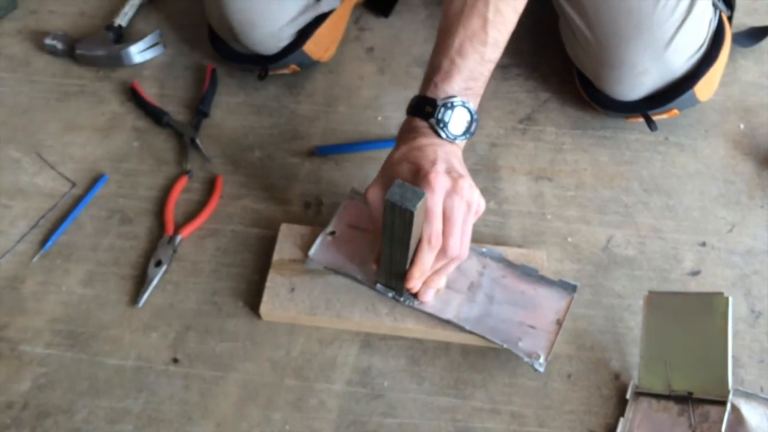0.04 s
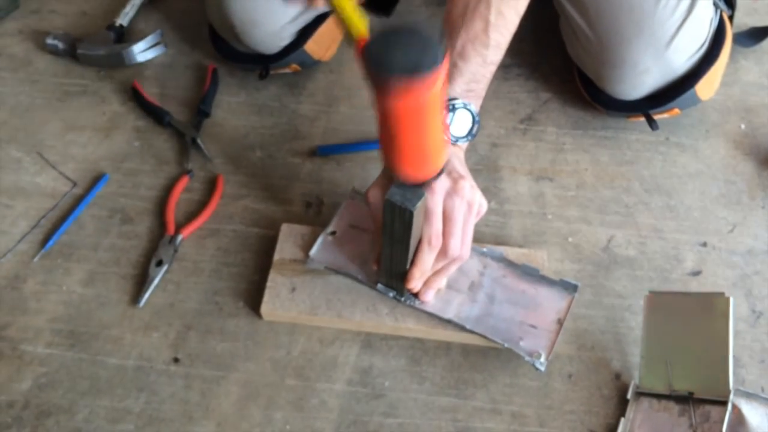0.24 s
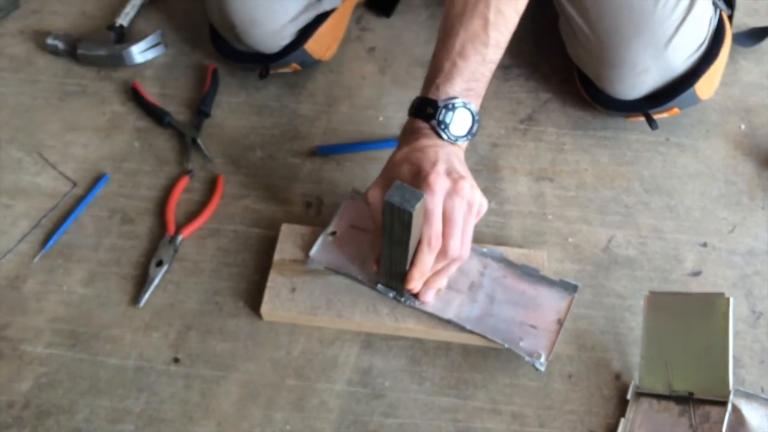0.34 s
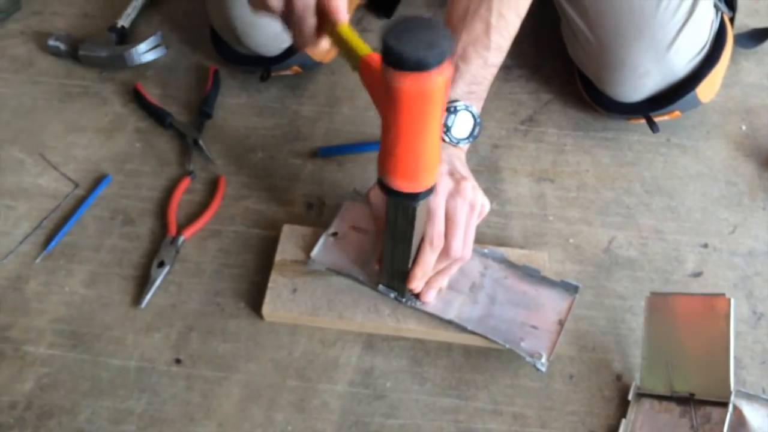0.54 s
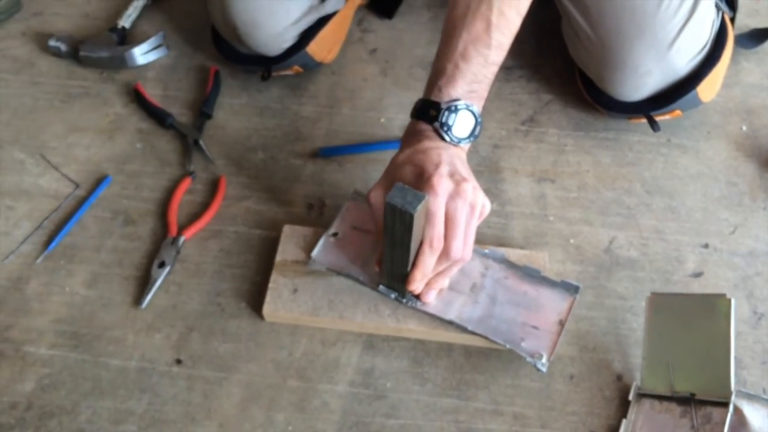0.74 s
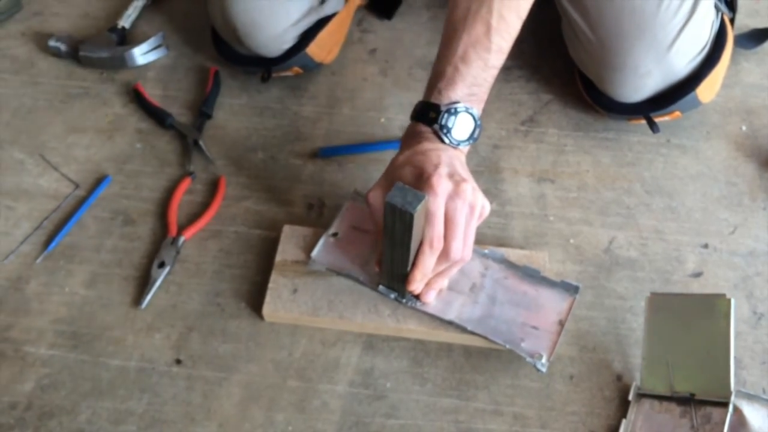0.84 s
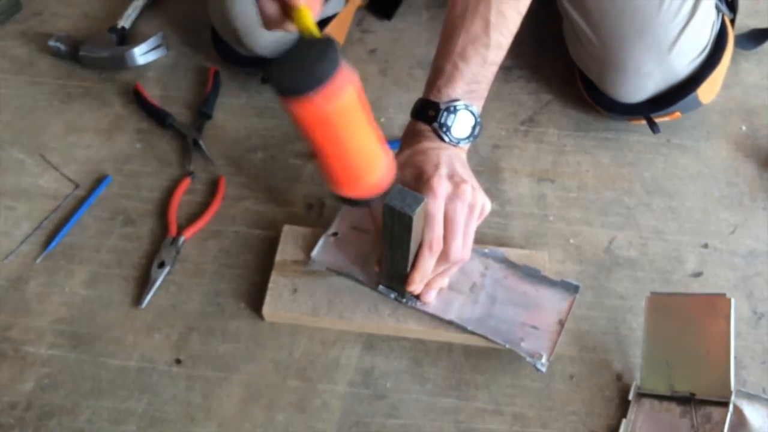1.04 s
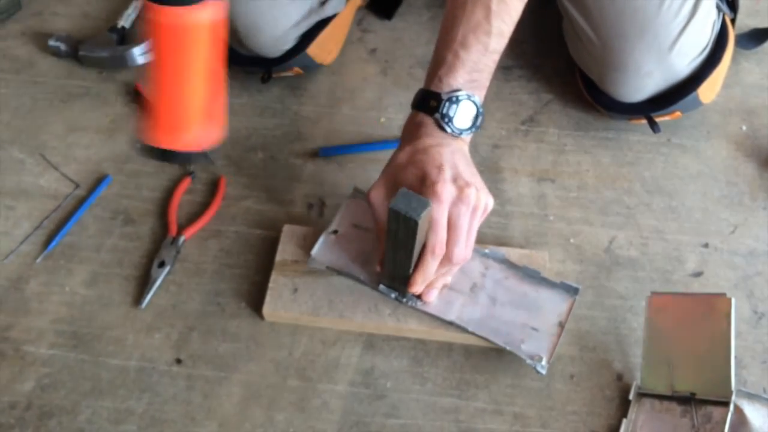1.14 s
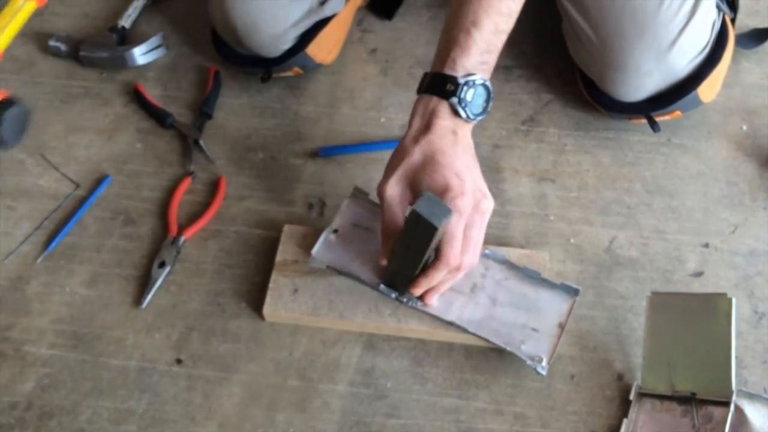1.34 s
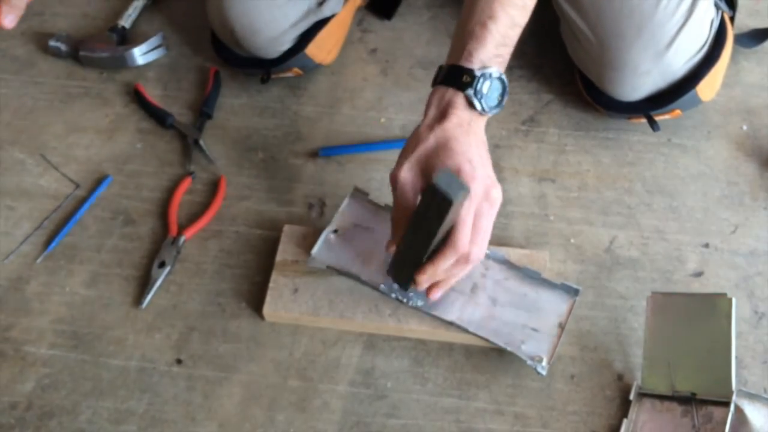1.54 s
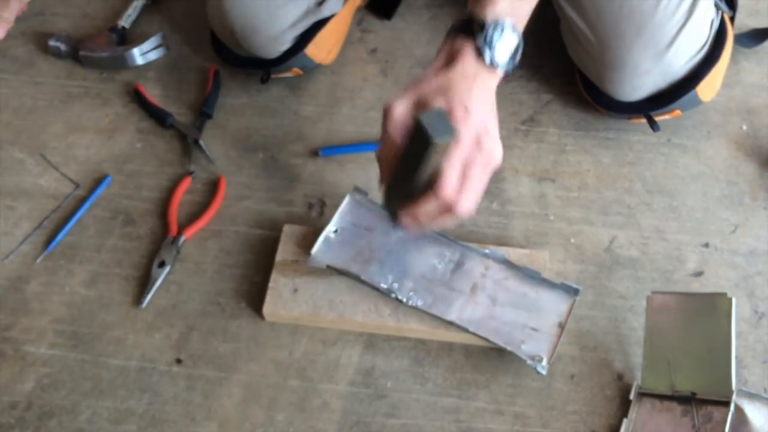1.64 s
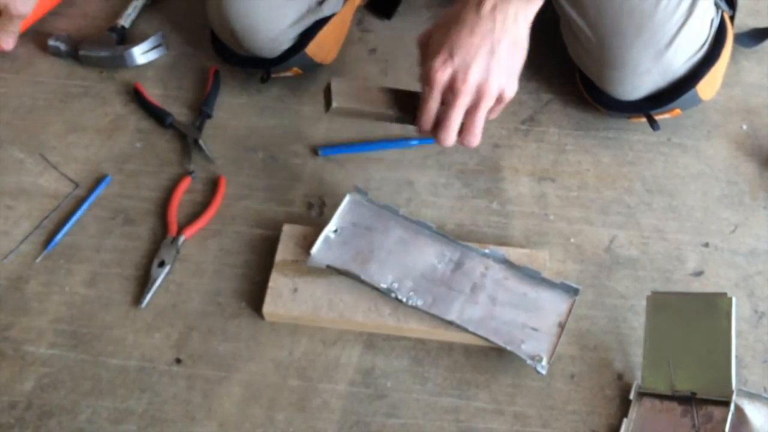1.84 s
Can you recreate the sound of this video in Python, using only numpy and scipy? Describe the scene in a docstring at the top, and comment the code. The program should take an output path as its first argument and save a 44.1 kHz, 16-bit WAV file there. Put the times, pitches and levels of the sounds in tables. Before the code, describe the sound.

Three loud hammer blows on a wood block over thin aluminium, echoing in a hard room

```python
"""Three hammer blows ring out in a large hard room with a far wall; a wood block is held on a thin aluminium panel.
A short swell of grainy noise leads into the first blow and sleeves rustle softly. The sound drops out briefly, then
small knocks, a clink of metal and a scrape follow, as the panel is dragged over the board beneath.
Random clicks make the clatter and scrape, ringing tones make wood and metal, and fading noise makes the room."""
import sys
import numpy as np
from scipy import signal
from scipy.fft import rfft, irfft
from scipy.io import wavfile

SR = 44100
rng = np.random.default_rng(int(sys.argv[2]) if len(sys.argv) > 2 else 0)


def master(y):
    """Save y as 16-bit WAV."""
    cut = np.clip(np.atleast_2d(y).T, -1, 1)
    pcm = np.round(cut * 32767)  # scale
    wavfile.write(sys.argv[1], SR, pcm.astype(np.int16))


N = 83790
TIME = np.arange(N) / SR  # seconds
DROPOUT_S = 1.5715

# Tones of the panel and floor boards ringing on: (frequency [Hz], relative level [dB], time to fall 60 dB [s])
PANEL_TONES = [(680, -20, .7), (1755, -8, .5), (1846, -9, .5), (1929, -11, .5), (2201, -8, .65),
               (2369, -9, .6), (2520, -10, .6), (2682, -9, .55), (2874, -9, .7), (3307, -11, .5),
               (3492, -12, .4), (4300, -12, .35)]


def from_db(db):
    """Turns decibels into a gain."""
    return 10 ** (np.asarray(db) / 20)


def rms_one(x):
    """Scales a sound to an average (rms) level of 1."""
    return x / np.sqrt(np.mean(x ** 2) + 1e-20)


def at_hz(points, hz):
    """Reads a curve of (frequency, value) points, with straight lines on a log frequency scale."""
    points_hz, values = np.array(points)[:, 0], np.array(points)[:, 1]
    return np.interp(np.log(hz), np.log(points_hz), values)


def in_time(rows):
    """Turns a curve of (time [s], level [dB]) into a gain for every sample."""
    times, levels_db = np.transpose(rows)
    return from_db(np.interp(TIME, times, levels_db))


def fade(t, t60):
    """Silent before time zero, then falls by 60 dB per t60 seconds."""
    return (t >= 0) * from_db(-60 * np.maximum(t, 0) / t60)


def band(x, low_hz, high_hz):
    """Keeps the sound between two frequencies."""
    return signal.sosfilt(signal.butter(2, [low_hz, high_hz], "band", fs=SR, output="sos"), x)


def above(x, hz, order=2):
    """Keeps the sound above one frequency."""
    return signal.sosfilt(signal.butter(order, hz, "high", fs=SR, output="sos"), x)


def colour(x, spectrum, tilt_db=0):
    """Shapes by a spectrum with minimum phase, so nothing sounds early; white noise keeps its rms."""
    size = 2 ** 13
    hz = np.maximum(np.arange(size // 2 + 1) * SR / size, 10)
    level_db = at_hz(spectrum, hz) + tilt_db * np.log2(hz / 3000)  # tilt in dB per octave
    # Folding the cepstrum (the transform of the log spectrum) gives minimum phase.
    cepstrum = irfft(np.log(from_db(level_db)))
    cepstrum[1:size // 2] *= 2
    cepstrum[size // 2 + 1:] = 0
    response = irfft(np.exp(rfft(cepstrum)))
    response = response / np.sqrt(np.sum(response ** 2))
    return signal.fftconvolve(x, response)[:len(x)]


def grit(per_s, spread_db):
    """Random clicks of uneven size and either sign, scaled to rms 1."""
    sizes = from_db(spread_db * np.minimum(rng.exponential(1, N), 4))
    signed = sizes * rng.choice([-1, 1], N)
    return rms_one(signed * (rng.random(N) < per_s / SR))


def waver(per_s):
    """Slow chance: random points, per_s of them each second, joined by straight lines."""
    knots = rng.standard_normal(200)
    return np.interp(TIME * per_s, np.arange(200), knots)


def ring(x, hz, t60):
    """A resonance: a click of height 1 sets off a dying sine that starts at about height 1."""
    shrink = from_db(-60 / (t60 * SR))  # per sample
    turn = 2 * np.pi * hz / SR  # radians per sample
    return signal.lfilter([0, np.sin(turn)], [1, -2 * shrink * np.cos(turn), shrink ** 2], x + 1e-18)


def strike(s, db, tones, spread_db):
    """One click sets all tones of a body ringing, each with a strength that varies by chance."""
    click = np.zeros(N)
    click[int(s * SR)] = from_db(db)
    chance = rng.normal(0, 1, len(tones))
    out = np.zeros(N)
    for (hz, tone_db, t60), luck in zip(tones, chance):
        out += from_db(tone_db + spread_db * luck) * ring(click, hz, t60)
    return out


def at_pitch(tones, pitch):
    """Multiplies the frequency of every tone of a body by one factor."""
    return [(hz * pitch, db, t60) for hz, db, t60 in tones]


def hammer():
    """Each blow: a dense clatter, knock and boom of wood, the ring of panel and floor, the room's answer."""
    # Hammer blows: (time [s], level of clatter and room [dB], knock [dB], knock pitch [factor],
    # boom [dB], boom pitch [Hz], brightness [dB per octave], far-wall echo [dB])
    blows = [(0.2058, -13, -24.5, 0.59, -17, 75, 0.23, -4.5),
             (0.57, -11.5, -27.5, 0.69, -24, 70, 0.27, -4.5),
             (0.9672, -12, -19.5, 1.01, -17, 150, 0.17, -7)]
    # Colour of the panel clattering against block and board: (frequency [Hz], relative level [dB per Hz])
    clatter_colour = [(59, -43), (100, -3), (438, -4), (1090, -5.5), (1370, -5), (2180, 0), (2690, -35),
                      (3770, 2), (4860, -5.5), (8770, -11.5), (15500, -16.5)]
    # Thud of block and board: (frequency [Hz], relative level [dB], time to fall 60 dB [s])
    wood_tones = [(364, -11.5, 0.022), (587, -3, 0.035), (674, 5.5, 0.024), (916, 0.5, 0.046),
                  (1350, -16, .04)]
    # Floor boards that swell in and ring: (frequency [Hz], level [dB], time to fall 60 dB [s])
    floor_tones = [(213.4, -38.5, 0.83), (289.4, -44.5, 1.23)]
    clicks_per_s, hold_s, clatter_t60_s = 6000, 0.0045, 0.066
    panel_db = -22
    boom_rise_s, boom_t60_s = 0.0048, 0.059
    floor_rise_s = 0.034

    out = np.zeros(N)
    for s, db, knock_db, pitch, boom_db, boom_hz, tilt_db, echo_db in blows:
        t = TIME - s
        # The clatter holds its level for a moment, then dies away.
        clatter = grit(clicks_per_s, 0.67) * (t >= 0) * fade(np.maximum(t - hold_s, 0), clatter_t60_s)
        clatter = above(colour(clatter, clatter_colour, tilt_db), 150)
        out += from_db(db) * (clatter + room_tail(t, echo_db, tilt_db))

        out += above(strike(s + .002, knock_db, at_pitch(wood_tones, pitch), 1.5), 150)
        out += strike(s, db + panel_db, PANEL_TONES, 1.5)

        boom = np.sin(2 * np.pi * boom_hz * t) * np.clip(t / boom_rise_s, 0, 1)
        out += from_db(boom_db) * boom * fade(t, boom_t60_s)
        out += strike(s, 0, floor_tones, 1.0) * np.clip(t / floor_rise_s, 0, 1)
    return out


def room_tail(t, echo_db, tilt_db):
    """Half-octave bands of noise, each dying at its own rate: first tail, near and far-wall echo, slow tail."""
    # Colour of the tail: (frequency [Hz], relative level [dB per Hz])
    tail_colour = [(35, -74), (60, -38.5), (170, -24), (250, -16.5), (345, -11), (509, -19), (705, -13),
                   (1070, -14), (1620, -10), (1760, -6), (2050, -4), (2710, -0.5), (3600, -3), (3900, -5),
                   (9970, -15.5), (15500, -28.5)]
    # How long the room rings: (frequency [Hz], time to fall 60 dB [s])
    room_t60 = [(80, 0.39), (200, 0.49), (700, 0.58), (1800, 0.67), (3000, 0.51), (5000, 0.59),
                (9000, 0.38), (14000, 0.23)]
    room_db, room_rise_s = -3.5, 0.0019
    slow_db, slow_factor = -7.5, 2.27  # the slow tail takes this many times longer to die
    near_s, near_db, near_width_s = 0.041, -1, 0.0027
    far_s, far_rise_s, far_t60_s = 0.063, 0.0059, 0.35
    panel_db, panel_t60_s = -42, 0.14
    grain_db, grain_per_s = 1.2, 30

    noise = colour(rng.standard_normal(N), tail_colour, tilt_db)
    # A second noise rings the panel's tones, so the tail carries them in blurred form.
    drive = colour(rng.standard_normal(N), tail_colour, tilt_db)
    for hz, db, _ in PANEL_TONES:
        noise = noise + from_db(panel_db + db) * ring(drive, hz, panel_t60_s)

    since_far = t - far_s
    far_rise = np.clip(since_far / far_rise_s, 0, 1)
    far = from_db(echo_db) * far_rise * fade(since_far - far_rise_s * far_rise, far_t60_s)
    near_bump = from_db(near_db) * np.exp(-.5 * ((t - near_s) / near_width_s) ** 2)

    spectrum = rfft(noise)
    bin_hz = np.maximum(np.arange(N // 2 + 1) * SR / N, 10)
    out = np.zeros(N)
    for centre_hz in 44 * 2 ** np.arange(0, 9, .5):
        # Neighbouring bands overlap and add up to the whole.
        share = np.cos(np.pi / 2 * np.clip(2 * np.log2(bin_hz / centre_hz), -1, 1)) ** 2
        t60 = at_hz(room_t60, centre_hz)
        first = fade(t, t60)
        slow = from_db(slow_db) * fade(t, t60 * slow_factor)
        near = near_bump * first
        level = np.sqrt(first ** 2 + slow ** 2 + far ** 2 + near ** 2)
        # Each band wavers on its own.
        out += irfft(spectrum * share, N) * level * from_db(grain_db * waver(grain_per_s))
    return from_db(room_db) * np.clip(t / room_rise_s, 0, 1) * out


def lead_in():
    """A short grainy noise, made of dense random clicks, swells just before the first blow and stops."""
    # Loudness of the lead-in noise: (time [s], level [dB])
    lead_in_level = [(.13, -75), (.165, -54), (.18, -63), (.19, -35.5), (.197, -32.5), (.206, -34),
                     (.21, -62)]
    # Colour of the lead-in noise: (frequency [Hz], relative level [dB per Hz])
    lead_in_colour = [(150, -17), (600, 9), (1200, -9), (2200, 2), (3200, -6), (4200, -11), (15000, -34.5)]
    running = TIME < lead_in_level[-1][0]
    return in_time(lead_in_level) * running * colour(grit(4500, 1.5), lead_in_colour)


def small_sounds():
    """Wood knocks ring briefly with a crack of noise; one metal clink rings with a short wash of hiss."""
    # Small knocks of wood: (time [s], level [dB], crack relative to knock [dB], pitch [factor])
    knocks = [(0.1985, -33.5, -46.5, 0.986), (1.555, -40, -3.5, 0.99), (1.595, -61, -5, 1.04),
              (1.640, -48, -15, 0.97), (1.733, -39, -23, 1.04), (1.747, -56.5, -21, 0.66)]
    # Tones of a knock: (frequency [Hz], relative level [dB], time to fall 60 dB [s])
    knock_tones = [(202, -4.5, 0.07), (424, -12, 0.03), (650, 1.5, 0.015), (983, 5.5, 0.023),
                   (1300, 2, 0.011), (2710, -15, 0.0027)]
    # Tones of the clink: (frequency [Hz], relative level [dB], time to fall 60 dB [s])
    clink_tones = [(1732, -15, .45), (1760, -11, .35), (4300, -13, .05), (4420, -14, .06), (7100, -1, .02),
                   (7200, -24, .7), (9600, -10, .015), (11800, -6, .012)]
    clink_s, clink_db = 1.6415, -43
    wash_db, wash_t60_s = -47.5, 0.14  # level before the band filter
    crack_t60_s = 0.017

    out = strike(clink_s, clink_db, clink_tones, 0)
    hiss = rng.standard_normal(N)
    out += from_db(wash_db) * band(hiss, 1500, 5000) * fade(TIME - clink_s, wash_t60_s)
    for s, db, crack_db, pitch in knocks:
        out += strike(s, db, at_pitch(knock_tones, pitch), 0.67)
        out += from_db(db + crack_db) * hiss * fade(TIME - s, crack_t60_s)
    return above(out, 150)


def drag():
    """Dense scraping clicks as the panel is dragged; they also make it sing at one low resonance."""
    # Loudness of the whole drag: (time [s], level [dB])
    drag_level = [(1.822, -81), (1.828, -43), (1.833, -35), (1.865, -36.5), (1.875, -36.5), (1.9, -39)]
    # Colour of the scrape: (frequency [Hz], relative level [dB per Hz])
    drag_colour = [(600, -14.5), (1200, -12), (1400, -10), (2000, -6), (2300, -8), (2600, -6), (4300, -2.5),
                   (5800, -9), (14300, -15.5), (15500, -17)]
    # Panel's low resonance within the drag: (time [s], relative level [dB])
    sing_level = [(1.826, 8), (1.833, -7), (1.862, -7), (1.87, -17), (1.89, -24), (1.897, -3)]
    clicks_per_s, sing_hz, sing_t60_s = 9000, 1420, 0.036

    clicks = grit(clicks_per_s, 1.2)
    scrape = above(colour(clicks, drag_colour), 1100, order=4)
    sing = in_time(sing_level) * rms_one(ring(clicks, sing_hz, sing_t60_s))
    started = TIME > drag_level[0][0]
    return in_time(drag_level) * started * (scrape + sing)


def rustles():
    """Sleeves rustle: bright cloth noise in soft, bell-shaped swells."""
    # Sleeve rustles: (centre [s], half width [s], level before filtering [dB])
    swells = [(.062, 0.024, -56.5), (.079, 0.0094, -48.5), (.46, 0.016, -52), (.85, 0.02, -59),
              (1.533, 0.0019, -65)]
    # Colour of the cloth: (frequency [Hz], relative level [dB per Hz])
    cloth_colour = [(1470, -67), (2500, -39), (2760, -24), (4080, -1), (4710, -0.5), (6950, -5),
                    (15500, 4.5)]
    level = np.zeros(N)
    for s, width_s, db in swells:
        level += from_db(db) * np.exp(-.5 * ((TIME - s) / width_s) ** 2)
    return level * colour(above(rng.standard_normal(N), 2500), cloth_colour)


def rumble():
    """Low-pitched noise whose level rises and falls."""
    # Loudness of the low rumble: (time [s], level [dB])
    rumble_level = [(0, -59.5), (.07, -61.5), (.2, -60), (.3, -71), (1.4, -70), (1.48, -61), (1.56, -60.5),
                    (1.7, -76), (1.8, -62.5), (1.85, -55), (1.9, -57)]
    low = band(rng.standard_normal(N + SR), 30, 164)
    return in_time(rumble_level) * rms_one(low[SR:])  # skips the second in which the filter settles


def room_noise():
    """Steady quiet noise shaped like the sound of the room."""
    # Colour of the room noise: (frequency [Hz], relative level [dB per Hz])
    noise_colour = [(88, -30.5), (150, -10), (500, -20.5), (900, -15.5), (1700, -17.5), (2800, -20.5),
                    (5000, -25.5), (8000, -35), (11000, -36), (15500, -41)]
    noise_db = -65
    return from_db(noise_db) * colour(rng.standard_normal(N + SR), noise_colour)[SR:]


def scene():
    """Adds the sources, with a quick fade at the dropout and the background coming back after it."""
    # Gain of room noise and rumble after the dropout: (time [s], level [dB])
    return_level = [(1.572, -25), (1.59, -17), (1.6, -2), (1.64, -3), (1.66, 0.5), (1.72, 1), (1.745, 8),
                    (1.82, 3.5)]
    before = np.clip((DROPOUT_S - TIME) / 0.0013, 0, 1)
    background = room_noise() + rumble()
    small = small_sounds()
    is_early = TIME < DROPOUT_S + .01  # the later small sounds skip the fade

    early = hammer() + lead_in() + rustles() + background + small * is_early
    late = background * in_time(return_level) * (1 - before) + small * ~is_early + drag()
    return (early * before + late)[None]


def record(dry):
    """Rounds off the peaks, then cuts the deepest bass and the top treble."""
    top = 0.66  # level at which peaks flatten
    rounded = top * np.tanh(dry / top)
    no_bass = above(rounded, 40)
    return signal.sosfilt(signal.ellip(12, .5, 60, 15450, fs=SR, output="sos"), no_bass)  # low-pass at 15450 Hz


dry = scene()
out = record(dry)
master(out)
```